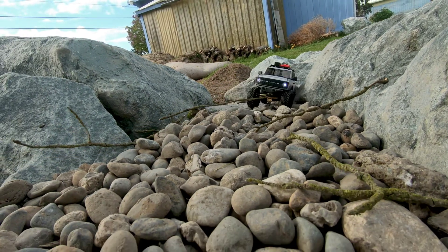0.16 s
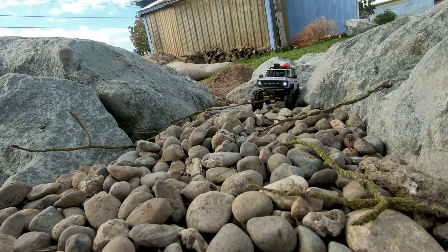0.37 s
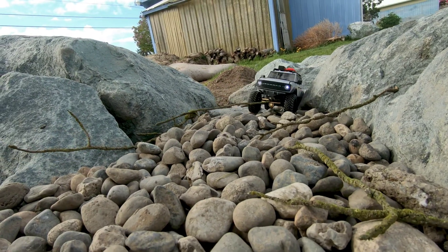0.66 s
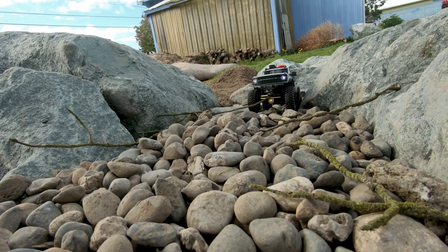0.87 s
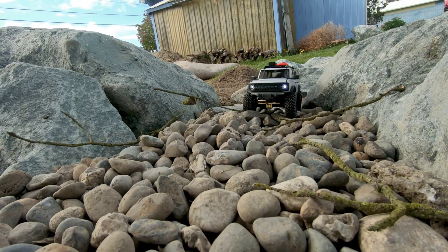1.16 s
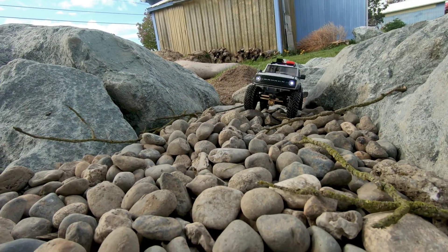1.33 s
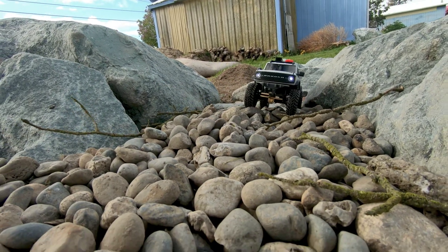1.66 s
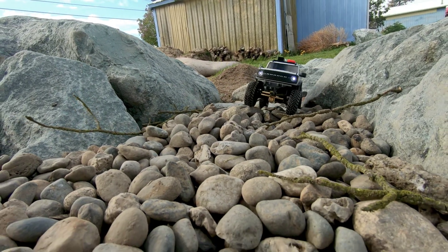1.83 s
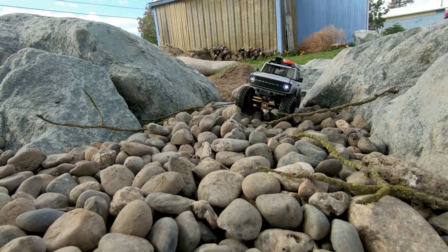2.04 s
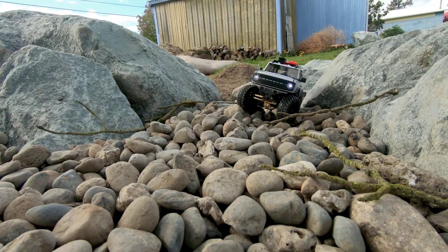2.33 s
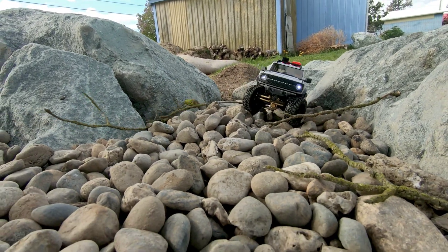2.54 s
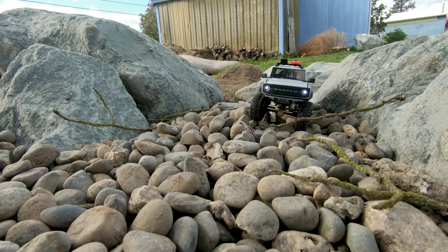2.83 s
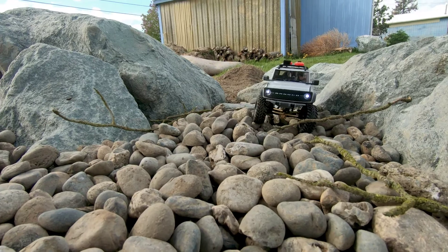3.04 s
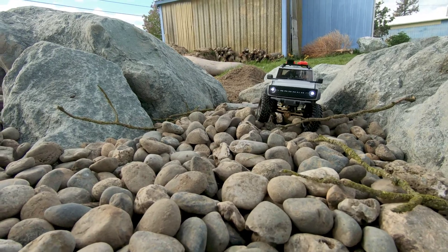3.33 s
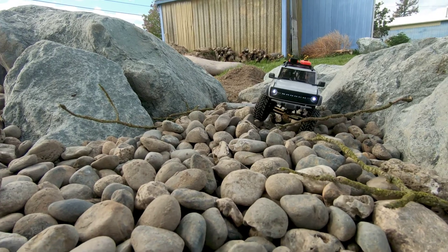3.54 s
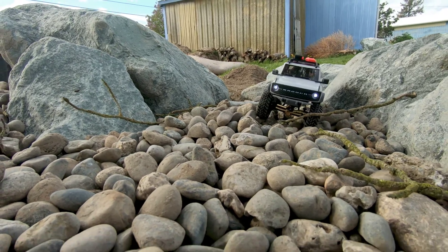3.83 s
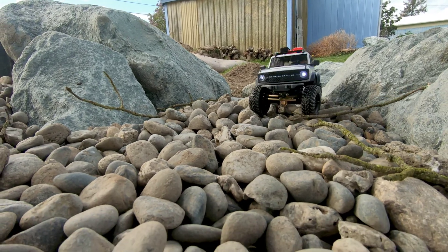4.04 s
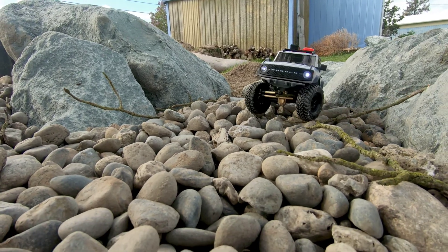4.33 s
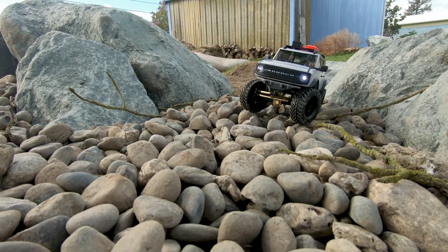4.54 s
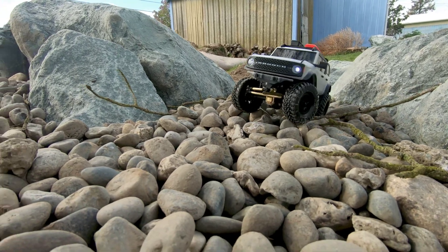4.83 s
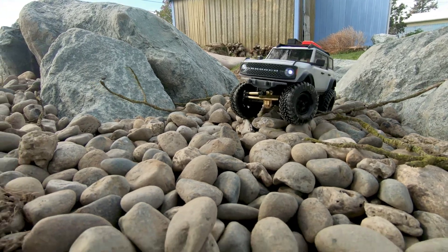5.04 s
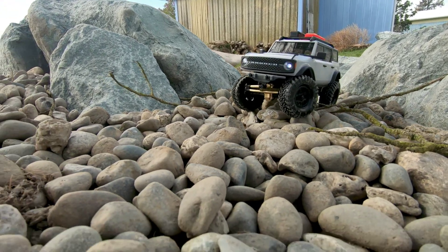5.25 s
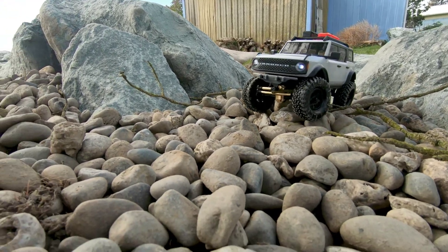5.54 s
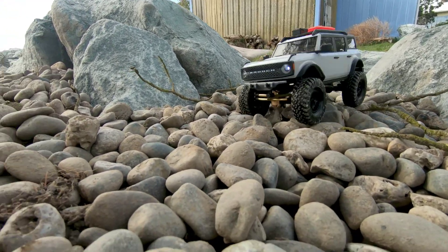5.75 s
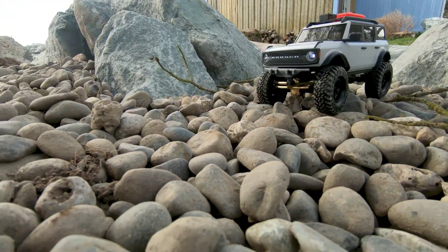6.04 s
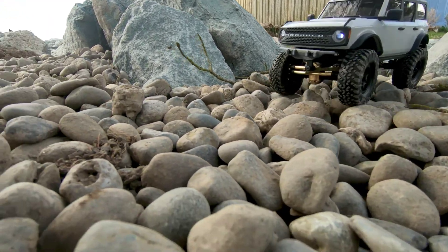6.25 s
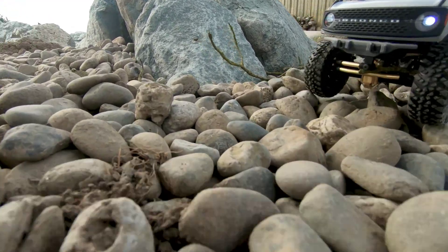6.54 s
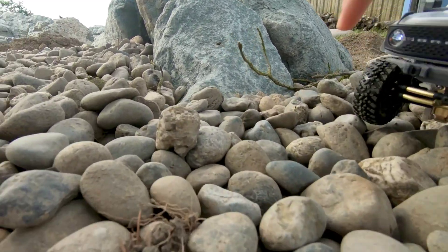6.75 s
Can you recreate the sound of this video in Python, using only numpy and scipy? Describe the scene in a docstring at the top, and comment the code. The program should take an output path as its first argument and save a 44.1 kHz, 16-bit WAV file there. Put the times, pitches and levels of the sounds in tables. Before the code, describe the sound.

A toy truck's raspy, nasal gear whine comes and goes over loose stones in an open yard. Early bursts are bright and rattling with sparse pebble clicks. Low wind puffs press on the microphone, then a flurry of knocks and grinding stones arrives while the motor runs lower. A sharp rev follows, then more short whines, steering fizz, soft chassis thumps and a very faint buzzy bird chirp.

```python
"""A rattling electric whine comes and goes in bursts as a small toy truck crawls over loose pebbles outdoors.
Its gears sing as summed tooth-mesh harmonics, with noise struck at the tooth rate for rattle and hiss.
Hollow housing knocks, stone clicks and tyre bumps are struck decaying modes; shifting stones are tiny ticks.
Air, wind and handling rumble are coloured noise; the steering servo and a faint bird are short arching glides."""
import sys
import numpy as np
from scipy import signal
from scipy.fft import rfft, irfft, next_fast_len
from scipy.io import wavfile

SR = 44100
rng = np.random.default_rng(int(sys.argv[2]) if len(sys.argv) > 2 else 0)


def log_audio(samples):
    """Write samples as a 16-bit WAV file to the path given in sys.argv[1]."""
    # one column per channel
    frames = np.atleast_2d(samples).T
    # limit to full scale, then quantise
    limited = np.clip(frames, -1, 1)
    pcm = np.round(limited * 32767).astype(np.int16)
    wavfile.write(sys.argv[1], SR, pcm)


N = 303760
TIME = np.arange(N) / SR

# housing knocks on stone: (t/s, ring level/dB, thud level/dB, crack level before its trim/dB,
#                           side against mid/dB, ring f/Hz)
KNOCK_EVENTS = [(.22, -44.5, -51, -64, 13, 1497), (2.656, -37, -46, -43.5, 10, 1380),
                (2.69, -51, -47.5, -51, 10.5, 1400), (2.843, -33, -38.5, -39, 9, 1308),
                (3.004, -41, -43, -44, 10.5, 1396), (3.073, -50, -57, -70, 10, 1300),
                (3.13, -37, -46.5, -40, 7.5, 1307), (3.183, -40.5, -38.5, -74, 4.5, 1380),
                (3.275, -39, -53, -47, -2, 1468), (3.323, -43, -43, -56, -7, 1336),
                (3.391, -40.5, -33, -54, 13, 1310), (3.422, -45.5, -53, -51.5, -2, 1380),
                (3.461, -36, -36.5, -58, -9, 1280), (3.536, -45.5, -48, -70, -10, 1364),
                (3.584, -35, -61, -53, -17, 1410)]
# ringing modes of a pebble: (f/Hz, relative level/dB, t60/s)
PEBBLE_MODES = [(888, 8.5, 0.027), (1675, 7, 0.047), (2070, 5.5, 0.02), (2620, 7, 0.04),
                (3245, 15.5, 0.0071), (4470, 17, 0.003), (5600, -28, 0.00089)]


def from_db(db):
    """Decibels to gain."""
    return 10 ** (np.asarray(db) / 20)


def rms_one(x):
    """Scale to unit power."""
    return x / np.sqrt(np.mean(x ** 2) + 1e-20)


def in_time(rows):
    """Draw each column of a breakpoint curve at every sample."""
    s, *columns = np.transpose(rows)
    return [np.interp(TIME, s, column) for column in columns]


def gain_at(spectrum, hz):
    """Gain of a spectrum at these frequencies; past its ends it falls another 30 dB per octave."""
    f, db = np.transpose(spectrum)
    octave, known = np.log2(np.maximum(hz, 1)), np.log2(f)
    octaves_outside = abs(octave - np.clip(octave, known[0], known[-1]))
    return from_db(np.interp(octave, known, db) - 30 * octaves_outside)


def colour(x, spectrum):
    """Filter a sound through a spectrum, then scale it to unit power."""
    size = next_fast_len(N)
    hz = np.arange(size // 2 + 1) * SR / size
    return rms_one(irfft(rfft(x, size) * gain_at(spectrum, hz), size)[..., :N])


def drift(rate):
    """Smooth random modulation of unit power, taking this many new values per second."""
    return rms_one(np.interp(TIME * rate, np.arange(N), rng.standard_normal(N)))


def noise():
    """White noise as a mid and a side channel."""
    return rng.standard_normal((2, N))


def spread(side_db):
    """Gains of mid and side."""
    return np.array([[1], [from_db(side_db)]])


def ring(x, modes, scatter_db=0):
    """Drive decaying resonators of alternating sign, each with a randomly scattered strength."""
    out = 0
    for k, (hz, db, t60) in enumerate(modes):
        r, w = np.exp(-np.log(1000) / (t60 * SR)), 2 * np.pi * hz / SR
        gain = (-1) ** k * from_db(db + scatter_db * rng.normal())
        out = out + gain * signal.lfilter([0, np.sin(w)], [1, -2 * r * np.cos(w), r * r], x + 1e-18)
    return out


def contact(grind_s, grit):
    """One touch: a push and a short grinding of rough surfaces that swells and dies."""
    u = TIME[:SR // 4] / grind_s
    rough = rng.standard_normal(len(u)) * np.sqrt(u) * np.exp(-u)
    return (u == 0) + grit * rough / np.linalg.norm(rough)


def blow(x, db):
    """Give a blow its level, its energy averaged over 30 ms."""
    return from_db(db) * x / np.sqrt(np.sum(x ** 2) / (.03 * SR))


def add(out, s, x):
    """Mix a sound in at a time."""
    at = max(int(s * SR), 0)
    out[..., at:at + x.shape[-1]] += x[..., :N - at]


def motor():
    """Mesh rate/Hz and gear and hiss levels/dB, which come up as the teeth take the load."""
    # motor speed through the bursts of throttle: (t/s, mean rate of the meshing teeth f/Hz)
    speed = [(0, 1194), (.09, 1356), (.16, 1653), (.23, 1620), (.29, 960), (.35, 502), (.47, 495),
             (.52, 1080), (.6, 1513), (.685, 1893), (.75, 1498), (.81, 1067), (.88, 1129), (.92, 1084),
             (1, 1249), (1.03, 1612), (1.06, 1602), (1.11, 1800), (1.175, 1600), (1.235, 1729),
             (1.29, 1628), (1.315, 1196), (1.35, 1080), (1.38, 532), (1.8, 509), (1.9, 828.5), (1.99, 1110),
             (2.02, 1150), (2.055, 1315), (2.12, 1221), (2.17, 930), (2.22, 511.5), (2.32, 512),
             (2.41, 788), (2.47, 865), (2.5, 768), (2.55, 1038), (2.6, 677), (2.7, 614), (3.85, 493),
             (3.93, 489.4), (3.95, 1002), (3.985, 1660), (4.07, 2080), (4.11, 1727), (4.14, 1332),
             (4.24, 679), (4.33, 650), (4.44, 878), (4.52, 791), (4.59, 847.6), (4.65, 1030), (4.7, 1252),
             (4.78, 1477), (4.81, 1680), (4.85, 1502), (4.88, 1110), (4.91, 986), (4.95, 1082),
             (5.02, 1041), (5.07, 830), (5.12, 806), (5.25, 498), (5.59, 500), (5.66, 684), (5.7, 980),
             (5.74, 1183), (5.77, 1146), (5.81, 1257), (5.86, 1090), (5.92, 507), (6.16, 491),
             (6.225, 1380), (6.245, 1406), (6.28, 1770), (6.305, 1656), (6.325, 1710), (6.35, 1437),
             (6.39, 1504), (6.41, 1660), (6.45, 1248), (6.48, 848), (6.53, 590), (6.89, 620)]
    # drive loudness, with brief swells as the whine crosses a gearbox resonance:
    # (t/s, full gear level/dB, full tooth-hiss level/dB)
    loudness = [(0, -41, -43.5), (.2, -42, -43.5), (.5, -52, -59), (.7, -45.5, -48.5), (.88, -39.5, -55),
                (1.05, -42, -47.5), (1.17, -46, -44.5), (1.27, -43, -52), (1.85, -48, -54.5),
                (2.08, -42.5, -48.5), (2.1, -34, -49), (2.12, -43.5, -46.5), (2.3, -43, -51.5),
                (2.5, -41.5, -54.5), (2.9, -42, -42), (3.5, -34.5, -53), (3.95, -42, -67),
                (3.964, -34, -64), (3.98, -38.5, -64), (4.07, -43.5, -56), (4.19, -46.5, -63),
                (4.3, -40.5, -62), (4.5, -40, -66), (4.82, -44, -53.5), (5.1, -42, -59), (5.65, -42, -65),
                (5.78, -41.5, -49), (5.95, -46.5, -65), (6.25, -38.5, -55.5), (6.435, -40.5, -51.5),
                (6.447, -31, -49), (6.46, -43, -59), (6.89, -41.5, -49)]
    idle_hz, bite_hz = 480, 293  # idle mesh rate; speed above it that brings up 63 % of full loudness
    idle_gear_db, idle_hiss_db = -64.5, -70
    (mesh_hz,), (gear_db, hiss_db) = in_time(speed), in_time(loudness)
    bite = 1 - np.exp(-np.maximum(mesh_hz - idle_hz, 0) / bite_hz)
    gear = np.hypot(from_db(idle_gear_db), from_db(gear_db) * bite)
    hiss = np.hypot(from_db(idle_hiss_db), from_db(hiss_db) * bite ** .97)
    return mesh_hz, 20 * np.log10(gear), 20 * np.log10(hiss)


def among_stones(x):
    """Shifting echoes off near stones make partials swell and drop out as the truck rocks and moves on."""
    # echoes off the nearest stones: (mean delay t/s, gain against the direct sound)
    stone_echoes = [(.0005, .16), (.0013, -.2), (.0029, .22), (.0047, -.2)]
    swing, changes_per_s = .12, 7  # rms share of each delay
    total, power = x, 1
    for delay, gain in stone_echoes:
        moving_delay = delay * (1 + swing * drift(changes_per_s))
        total = total + gain * np.interp(TIME - moving_delay, TIME, x)
        power += gain ** 2
    return total / np.sqrt(power)


def gear_whine(phase, mesh_hz, clean, count):
    """Meshing teeth sing in harmonics, coloured by the gearbox and blurred by uneven contact."""
    # gearbox resonances: (f/Hz, relative level/dB)
    gearbox = [(600, -3), (1050, -5), (1400, -8.5), (1750, -4.5), (2150, -2), (2480, 6), (2850, 0),
               (3350, -0.5), (3900, -8), (4800, -4), (6000, -12.5), (9000, -8)]
    # mesh harmonics: (multiple of the mesh rate, relative level/dB)
    mesh = [(1, 1.5), (2, 5), (3, 1.5), (4, -7), (5, -14), (6, -11)]
    evenness = .43  # .5 = equally loud at any speed; less = the whine swells as it crosses a resonance
    side_tones, side_tone_depth = 4, .54  # pairs beside each harmonic; strength when the teeth are loose
    whine, power = 0, 0
    for order, db in mesh:
        k = round(order)
        gain = from_db(db) * gain_at(gearbox, k * mesh_hz)
        # the pinion runs slightly off centre, which puts side tones beside each harmonic
        strands = 0
        for m in range(-side_tones, side_tones + 1):
            if m:
                side_tone = np.sin((k + m / count) * phase + rng.uniform(0, 2 * np.pi))
                strands = strands + drift(22) * side_tone / np.sqrt(abs(m))
        rough = from_db(2.2 * drift(150) + 2.2 * drift(50))
        # uneven contact blurs the higher harmonics more
        blur = .07 * k * (drift(600) * np.sin(k * phase) + drift(600) * np.cos(k * phase))
        tone = np.sin(k * phase) + side_tone_depth * np.sqrt(1 - clean) * strands + blur
        whine = whine + gain * rough * tone / np.hypot(1, .2 * k)
        power = power + gain ** 2
    flutter = from_db(1.6 * drift(80))  # the teeth catch and slip
    return rms_one(among_stones(whine / power ** evenness) * flutter)


def winding_tone(mesh_hz):
    """The speed controller chops the current, and the windings sing while the motor pulls."""
    switching_hz, level_db, smear = 8000, -70.8, .5  # uneven load spreads the tone
    pulling = np.clip((mesh_hz - 480) / 90, 0, 1)
    chop = 2 * np.pi * switching_hz * TIME
    winding = np.sin(chop) + smear * (drift(220) * np.sin(chop) + drift(220) * np.cos(chop))
    return from_db(level_db) * pulling * from_db(2 * drift(18)) * winding * [[1], [-.6]]


def drive(count=11, tooth_depth=0.23, gate=0.092, chatter_db=3.5, rattle_db=-1.5, hiss_db=-4.5):
    """A pinion of uneven teeth sings through the gearbox; loose teeth rattle in time with it."""
    # how the teeth meet at speed: (t/s, share of clean whine 0-1; the rest rattles)
    clean_share = [(0, .6), (.22, .74), (.29, .05), (.45, .3), (.6, .78), (.82, .94), (.98, .94),
                   (1.1, .66), (1.25, .88), (1.35, .5), (2.05, .82), (4, .87), (4.2, .55), (4.5, .85),
                   (4.8, .7), (5.1, .75), (5.8, .72), (6.25, .75), (6.45, .9), (6.6, .2)]
    # noise of loose teeth: (f/Hz, relative level/dB)
    rattle_tone = [(900, -6), (1700, -16), (2450, 4.5), (2850, 0.5), (3250, -0.5), (4000, -8.5),
                   (4800, -6.5), (5800, -13.5), (7500, -22)]
    # dry hiss of the teeth: (f/Hz, relative level/dB)
    hiss_tone = [(4500, -5), (5500, -8), (7100, 1.5), (8200, -4), (9000, -8), (10000, -6), (11600, -18.5),
                 (13000, -12.5), (14500, -23)]
    coast_hz_per_s = 6000  # slowing this fast takes the load off the teeth, and they rattle sooner
    (mesh_hz, gear_db, teeth_db), (clean,) = motor(), in_time(clean_share)
    # the teeth only stay in contact, and sing, once the motor is up to speed
    coasting = np.clip(-np.gradient(mesh_hz) * SR / coast_hz_per_s, 0, 1)
    in_contact = np.clip((mesh_hz - 520) / (280 + 600 * coasting ** 2), 0, 1)
    clean = np.clip(clean, 0, .95) * in_contact
    # the stones tug at the motor 45 times a second; finer jitter rides on top
    waver = .014 * drift(45) + .008 * drift(150) + .012 * drift(900)
    phase = 2 * np.pi * np.cumsum(mesh_hz * (1 + waver)) / SR
    whine = gear_whine(phase, mesh_hz, clean, count) * from_db(gear_db) * np.sqrt(clean)

    tooth_pulse = (1 + gate * np.cos(phase)) * (1 + tooth_depth * np.cos(phase / count))
    strikes = tooth_pulse * from_db(chatter_db * drift(150))
    rattle_gain = from_db(gear_db + rattle_db) * np.sqrt(1 - clean)
    rattle = colour(noise() * strikes, rattle_tone) * rattle_gain * spread(-8.0)
    hiss_gain = from_db(teeth_db + hiss_db)
    hiss = colour(noise() * strikes, hiss_tone) * hiss_gain * spread(3.3)

    # sharp tooth edges add a rasping comb of high harmonics, with two weaker tones between each pair
    edges = 0
    for k in range(11, 31):
        tone = np.sin(k * phase / 3 + .5 * drift(300))
        edges = edges + from_db(5 * drift(45)) * tone * (.5 if k % 3 else 1)
    edges = colour(edges * (1 + 2 * tooth_depth * np.cos(3 * phase / count)), hiss_tone)
    rasp = .85 * edges * np.sqrt(clean) * hiss_gain * [[1], [0]]
    hiss = hiss * np.sqrt(1 - .58 * clean) + rasp
    hiss[0], rattle[0] = among_stones(hiss[0]), among_stones(rattle[0])
    hiss[1] -= 0.74 * hiss[0]   # the treble leans to the right
    return rattle + hiss + whine * spread(-10.0) + winding_tone(mesh_hz)


def buffeting():
    """Strength of the air on the microphone: a light breeze and puffs that swell and die."""
    # puffs of air: (peak t/s, half length t/s, level/dB)
    gusts = [(0.125, 0.29, -43), (0.588, 0.1, -40.5), (1.02, 0.14, -38.5), (2.27, 0.2, -34.5),
             (2.898, 0.18, -33), (3.324, 0.29, -37), (3.83, 0.17, -44), (4.4, 0.35, -46.5),
             (4.91, 0.24, -43.5), (5.211, 0.13, -34), (5.855, 0.052, -40), (6.447, 0.042, -35)]
    breeze_db = -52.5
    power = from_db(breeze_db) ** 2
    for s, half, db in gusts:
        power = power + (from_db(db) * np.exp(-((TIME - s) / half) ** 2)) ** 2
    return np.sqrt(power)


def ground(grains_per_s=35, grain_db=-20):
    """Grit rings as random struck pebbles; air, buffeting and handling rumble are coloured noise."""
    # low rumble of the microphone being handled: (t/s, level/dB)
    handling_level = [(0, -55), (1.8, -55), (2.7, -48.5), (3.1, -40.5), (3.6, -42), (4.3, -48),
                      (5.1, -46.5), (5.7, -44.5), (6.4, -43.5), (6.89, -50)]
    # open air, which the fine grit follows more softly: (t/s, air level/dB)
    yard_level = [(0, -56.5), (.13, -43.5), (.42, -58), (1.1, -50.5), (1.75, -58), (2.6, -51), (3.45, -59),
                  (3.87, -58.5), (4.5, -50.5), (5.8, -53), (6.89, -51)]
    # spectra of the open air, buffeting and handling rumble: (f/Hz, relative level/dB)
    air_tone = [(200, 0.5), (380, 0.5), (520, -5), (680, 6), (900, 3.5), (1300, -3), (1900, -12),
                (4000, -57)]
    buffet_tone = [(12, -2), (25, -1), (45, 3), (85, 2.5), (130, -6.5), (220, -22)]
    handling_tone = [(90, -12), (150, 1), (205, 0.5), (270, -10), (400, -14), (700, -20)]
    (handling_db,), (yard,) = in_time(handling_level), in_time(yard_level)
    sizes = from_db(4 * np.minimum(rng.exponential(1, N), 3))
    grains = (rng.random(N) < grains_per_s / SR) * sizes * noise()
    grit = rms_one(ring(grains, PEBBLE_MODES)) * from_db(yard + grain_db) * spread(-10)
    air = colour(noise() * from_db(2.68 * drift(40)), air_tone) * from_db(yard) * spread(0.086)
    wind = colour(noise(), buffet_tone) * buffeting() * spread(0.7)
    wind[1] += 0.16 * wind[0]   # the left port catches more
    unsteady = noise() * from_db(2 * drift(35))
    handling = colour(unsteady, handling_tone) * from_db(handling_db) * spread(-27.0)
    return grit + air + wind + handling


def struck_shell(hz):
    """The pressing stone detunes every shell mode but the first and damps each one differently."""
    # the housing's shell: (multiple of the ring pitch, relative level/dB, t60 before random damping/s)
    shell_modes = [(1, 2.5, 0.033), (.909, -1, 0.034), (.72, -35, 0.0051), (1.2, -6.5, 0.013),
                   (1.52, -8, 0.011)]
    modes = []
    for k, (ratio, db, t60) in enumerate(shell_modes):
        detune = 1 + .04 * (k > 0) * rng.normal()
        modes.append((hz * ratio * detune, db, t60 * rng.uniform(.85, 1.45)))
    return modes


def knocks(crack_db=-1, lag_s=0.001166):
    """Stone cracks against the housing, which rings and shakes the two microphones against each other."""
    # modes of the housing's thud and of the stone's crack: (f/Hz, relative level/dB, t60/s)
    thud_modes = [(271.5, -6.5, 0.035), (427, -3.5, 0.029), (650, 3, 0.0067), (915, -10, 0.019)]
    crack_modes = [(2430, 0.5, 0.0037), (4760, -0.5, 0.005), (6630, 5, 0.0037), (7600, 3.5, 0.0034),
                   (10500, -17, 0.0035)]
    out = np.zeros((2, N))
    for s, ring_level, thud_level, crack_level, side_db, hz in KNOCK_EVENTS:
        shell = blow(ring(contact(0.0048, 0.6), struck_shell(hz), 2.0), ring_level)
        thud = blow(ring(contact(0.0017, 3.8), thud_modes, 4.7), thud_level)
        crack = blow(ring(contact(.0014, 5), crack_modes, 3), crack_level + crack_db)
        # the two ports move out of step: the side lags by a quarter cycle
        add(out[0], s + lag_s, shell + thud)
        add(out[1], s + lag_s + 1 / (4 * hz), -(shell + thud) * from_db(side_db))
        add(out, s, crack * spread(min(side_db, 0) - 3) * [[1], [-1]])
    return out


def shifting_stones(grains_per_s=600, cycles=22, settle_db=-9, count=18):
    """Small stones of many sizes tick against each other, also around each knock and where a tyre slips."""
    # stones shifting under the housing as it is pushed along: (t/s, level/dB)
    shifting = [(2.55, -73), (2.68, -55), (2.8, -64), (3.05, -68), (3.25, -61), (3.4, -44), (3.55, -53.5),
                (3.7, -50.5), (3.88, -68)]
    # a tyre slips and grinds small stones together: (peak t/s, half length t/s, level/dB)
    slips = [(3.028, .012, -50), (3.647, 0.017, -55.5), (5.832, 0.017, -40.5), (6.422, 0.013, -41)]
    # tone of the shifting stones: (f/Hz, relative level/dB)
    shifting_tone = [(400, -4.5), (620, 7), (900, 0), (1350, 2.5), (2000, -0.5), (3200, -3), (4500, -3.5)]
    settle_s, scuff_s = .021, .008   # stones go on rattling after a knock, and scuff just before it
    pushed = (TIME > shifting[0][0]) & (TIME < shifting[-1][0])
    level = from_db(in_time(shifting)[0]) * pushed
    for s, ring_level, *_ in KNOCK_EVENTS:
        distance = np.maximum((TIME - s) / settle_s, (s - TIME) / scuff_s)
        level = level + from_db(ring_level + settle_db) * np.exp(-distance)
    for s, half, db in slips:
        level = level + from_db(db) * np.exp(-((TIME - s) / half) ** 2)
    sizes = from_db(4.5 * np.minimum(rng.exponential(1, N), 3)) * rng.choice([-1, 1], N)
    ticks = sizes * (rng.random(N) < grains_per_s / SR)
    dealt = rng.integers(0, count, N)  # which stone size each tick falls to
    stones = 0
    for k, hz in enumerate(np.geomspace(430, 4400, count)):
        rung = rms_one(ring(ticks * (dealt == k), [(hz, 0, cycles / hz)]))
        stones = stones + gain_at(shifting_tone, hz) * rung
    return rms_one(stones) * level * spread(0.5)


def bump(hz, t60, wobble=0.077, overtone=1.455, overtone_db=-11):
    """The chassis drops on its soft tyres: a rounded swell that rings down, slightly unsteady."""
    swell_s = .0028  # the rubber gives before the chassis takes the weight
    t = TIME[:SR // 3]
    phase = 2 * np.pi * np.cumsum(hz * (1 + wobble * drift(102)[:len(t)])) / SR
    fade = np.exp(-np.log(1000) * t / t60)
    swell = 1 - np.exp(-(t / swell_s) ** 2)
    return swell * fade * (np.sin(phase) + from_db(overtone_db) * fade * np.sin(overtone * phase))


def pebbles(body_db=-17, snap_db=-12):
    """Stones tip and click under the tyres; the chassis drops with a soft bump."""
    # the loudest clicks: (t/s, level before the body and snap trims/dB, extra snap level/dB)
    clicks = [(.9676, -24, -8), (1.1477, -34, -13), (1.251, -33, -24), (1.5174, -43, -21),
              (1.6027, -39, -15), (2.2367, -37, -21), (2.412, -32, -26), (2.9986, -23, -12),
              (3.1842, -31, -20), (3.2735, -22, -19), (3.3937, -23, -17), (3.406, -26, -22),
              (3.4635, -31, -20), (3.5857, -25, -20), (3.719, -37, -15), (3.777, -35, -25),
              (4.2438, -34, -23), (4.6915, -28, -29), (4.9878, -30, -22), (5.0202, -33, -23),
              (5.556, -34, -19), (5.833, -29, -24), (6.3876, -25, -16)]
    # soft bumps of tyres and chassis: (t/s, level/dB, mean f/Hz, t60/s)
    bumps = [(2.809, -35, 94.5, .08), (2.85, -32, 75, .12), (3.003, -31, 87, .1),
             (3.385, -28.5, 129.6, 0.063), (3.405, -27, 114, .06), (3.466, -29, 136, 0.063),
             (3.638, -34.5, 186, 0.13), (3.949, -25.5, 169, 0.21), (5.547, -32.5, 200.6, .13),
             (6.41, -36, 170.7, 0.13), (6.625, -33, 206, 0.031)]
    out = np.zeros(N)
    treble = signal.butter(2, [5500, 11000], "band", fs=SR, output="sos")
    for s, db, bright_db in clicks:
        add(out, s, blow(ring(contact(.0024, 4), PEBBLE_MODES, 3), db + body_db))
        snap = signal.sosfilt(treble, contact(0.00074, 1.7))
        add(out, s, blow(snap, db + bright_db + snap_db))
    for s, db, hz, t60 in bumps:
        add(out, s, blow(bump(hz, t60), db))
    return out * spread(-12.0)


def glide(length, top_hz, crest, sag, flutter, rasp, partials):
    """A short arching whistle with a raspy edge; partials are (multiple, relative level/dB)."""
    u = np.linspace(0, 1, int(length * SR))
    waver = drift(900)[:len(u)]
    arch = 1 - sag * (u - crest) ** 2
    phase = 2 * np.pi * np.cumsum(top_hz * arch * (1 + flutter * waver)) / SR
    smear = np.cumsum(rng.normal(0, .5, len(u)))  # wandering phase roughens the tone
    tone = 0
    for k, db in partials:
        tone = tone + from_db(db) * (np.sin(k * phase) + rasp * np.sin(k * (phase + smear)))
    return rms_one(tone * from_db(4 * waver)) * np.sqrt(np.abs(np.sin(np.pi * u)))


def bird(sag=0.45, flutter=0.075, rasp=.7):
    """Far-off buzzy chirps, each a fluttering pitch arch roughened by phase noise."""
    # chirps: (t/s, length t/s, level/dB, top f before the 0.94 tuning/Hz,
    #          where in the glide the pitch peaks 0-1)
    chirps = [(2.218, 0.097, -59, 4230, 0.15), (3.74, 0.13, -56, 3910, 0.77), (5.29, 0.27, -59, 3780, 0.38),
              (6.075, 0.17, -60.5, 4377, 0.13)]
    out = np.zeros(N)
    for s, length, db, top_hz, crest in chirps:
        add(out, s, from_db(db) * glide(length, top_hz, crest, sag, flutter, rasp, [(0.94, 0)]))
    return out * spread(-16)


def servo(sag=.2, flutter=0.0164, rasp=0.22, grain_db=2.0):
    """The steering motor speeds up and slows with each small turn; its gears scratch and fizz along."""
    # turns: (t/s, length t/s, level/dB, top f/Hz, where in the glide the pitch peaks 0-1,
    #         clean whistle share 0-1)
    turns = [(2.655, 0.13, -45, 8170, .7, 0.6), (2.875, 0.056, -50.5, 7600, 0.31, 0.5),
             (2.945, 0.043, -60, 7600, 0.58, 0.3), (3.049, 0.077, -48, 6550, 0.53, 0.35),
             (3.16, 0.083, -56.5, 7330, 0.5, .25), (3.302, 0.086, -46.5, 7350, 0.11, 0.93),
             (3.447, 0.091, -56.5, 7500, 0.52, .25), (3.606, 0.088, -52.5, 7300, 0.3, 0.64),
             (3.739, 0.026, -58, 7500, .5, 0.2), (5.41, 0.045, -60, 7600, .6, 0.25),
             (5.462, 0.046, -50, 7200, 0.34, 0.02), (5.513, 0.059, -58.5, 7500, 0.57, 0.35),
             (5.73, 0.026, -51, 8000, .6, 0.22), (5.783, 0.04, -50, 7600, 0.61, 0.61)]
    # hiss of the servo's tiny gears: (f/Hz, relative level/dB)
    servo_gears = [(4500, 0), (6200, 5.5), (7600, 10), (9000, -6), (10600, 6.5), (12000, -2), (13200, 3),
                   (14500, -14)]
    # whistle partials: (multiple of the servo's pitch, relative level/dB)
    servo_partials = [(1, 7), (1.5, -13), (2, -17)]
    out = np.zeros(N)
    fizz = colour(rng.standard_normal(N) * from_db(grain_db * drift(500)), servo_gears)
    for s, length, db, top_hz, crest, clean in turns:
        whirr = glide(length, top_hz, crest, sag, flutter, rasp, servo_partials)
        gears = fizz[int(s * SR):][:len(whirr)] * signal.windows.tukey(len(whirr), .6)
        add(out, s, from_db(db) * (np.sqrt(clean) * whirr + np.sqrt(1 - clean) * gears))
    return out * spread(-4.0) * [[1], [-1]]


def scene():
    """Sum all sources as mid and side, then turn them into left and right."""
    # stereo width of everything but the knocks: (t/s, side gain/dB)
    width = [(0, -4.5), (3.2, -2), (3.5, -16.5), (3.9, -26)]
    mid, side = drive() + ground() + shifting_stones() + pebbles() + bird() + servo()
    knock_mid, knock_side = knocks()
    mid, side = mid + knock_mid, side * from_db(in_time(width)[0]) + knock_side
    return np.array([mid + side, mid - side])


def record(dry):
    """The top rolls off, then is cut steeply."""
    soft = signal.sosfilt(signal.butter(4, 13800, fs=SR, output="sos"), dry)
    return signal.sosfilt(signal.ellip(10, .2, 85, 15200, fs=SR, output="sos"), soft)


dry = scene()
out = record(dry)
log_audio(out)
```